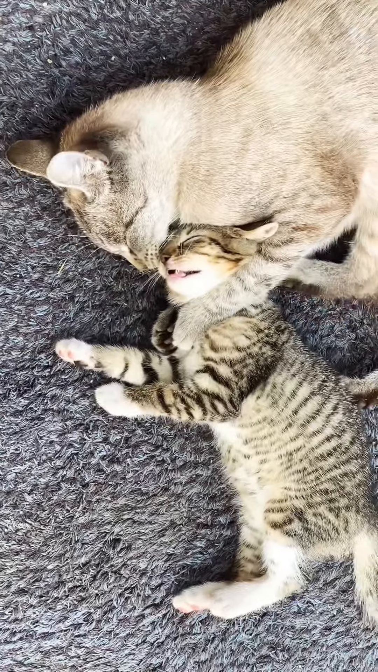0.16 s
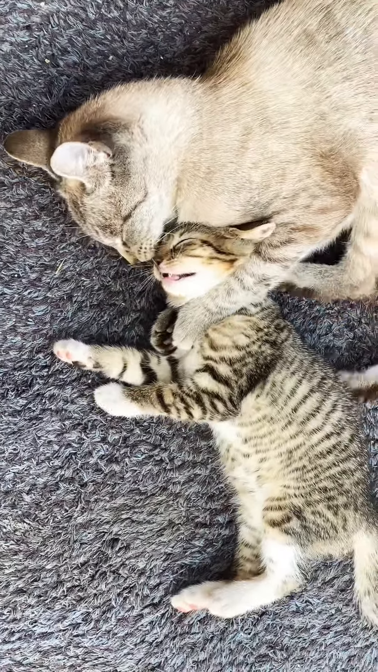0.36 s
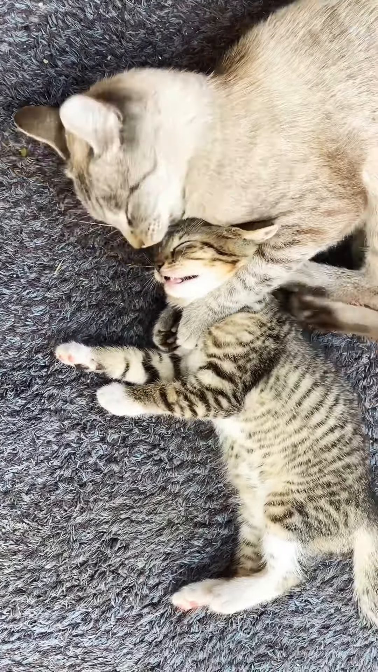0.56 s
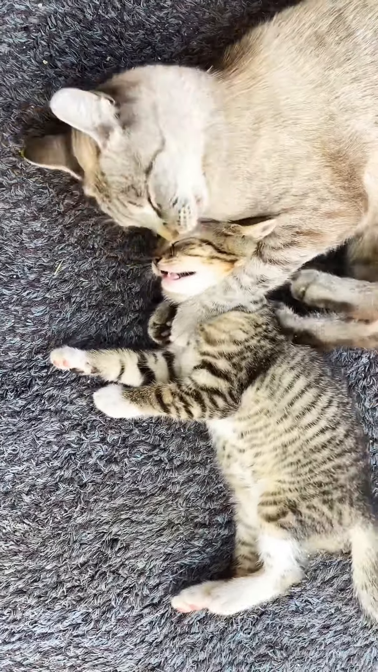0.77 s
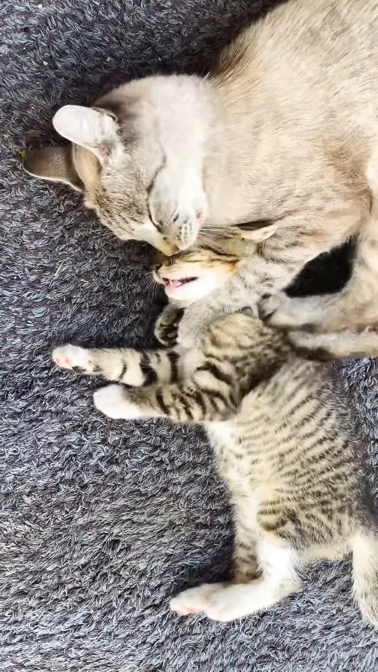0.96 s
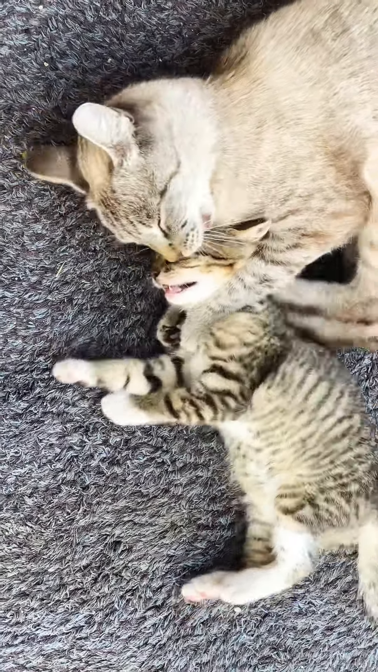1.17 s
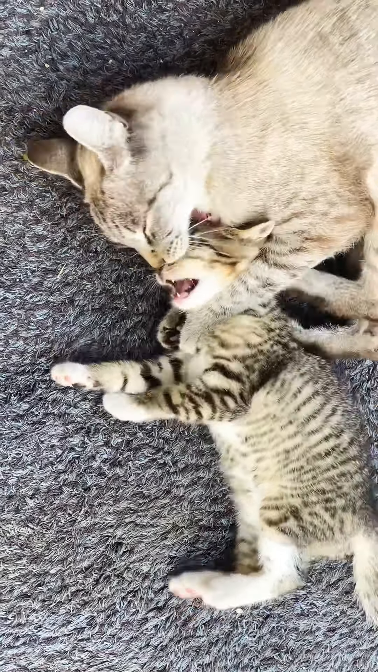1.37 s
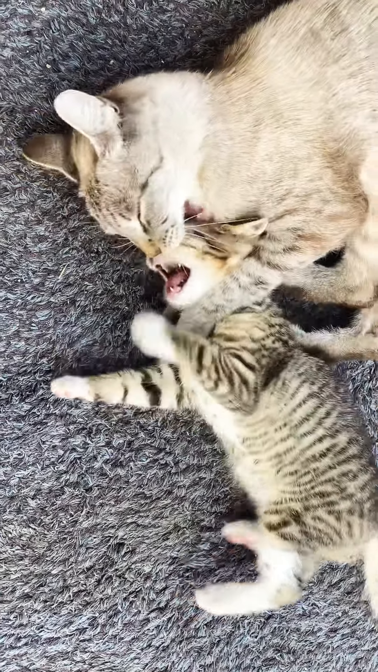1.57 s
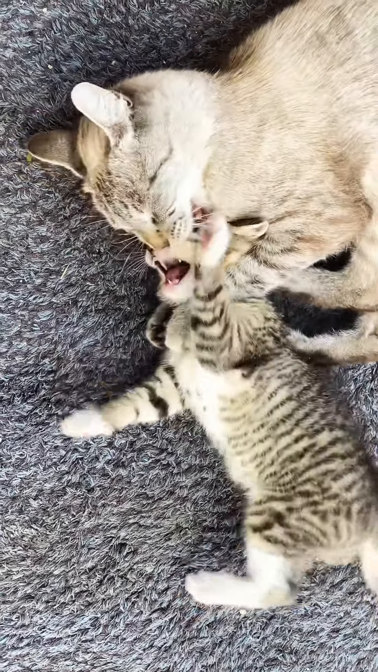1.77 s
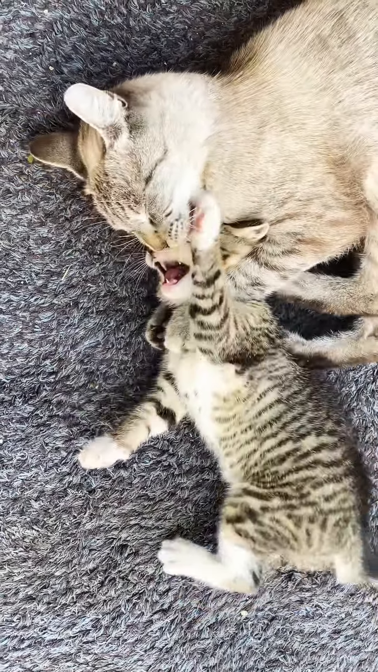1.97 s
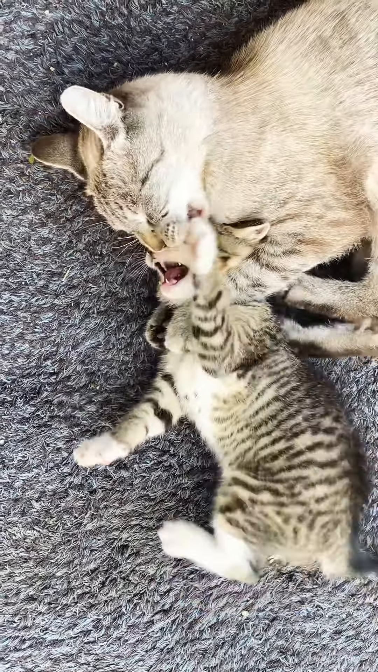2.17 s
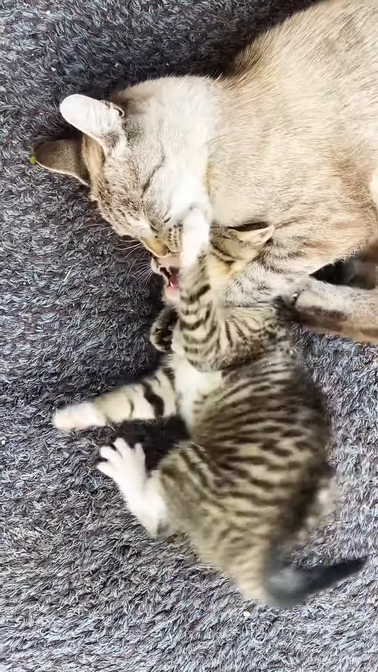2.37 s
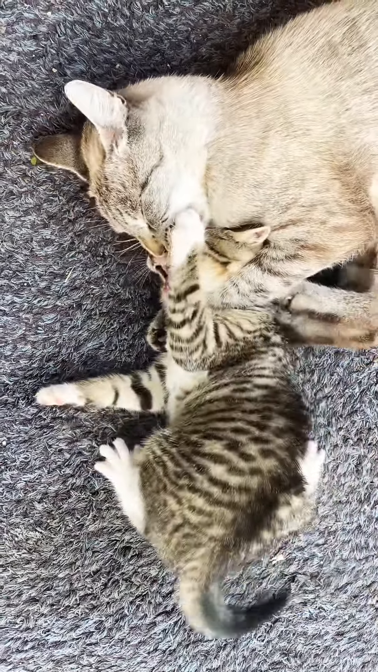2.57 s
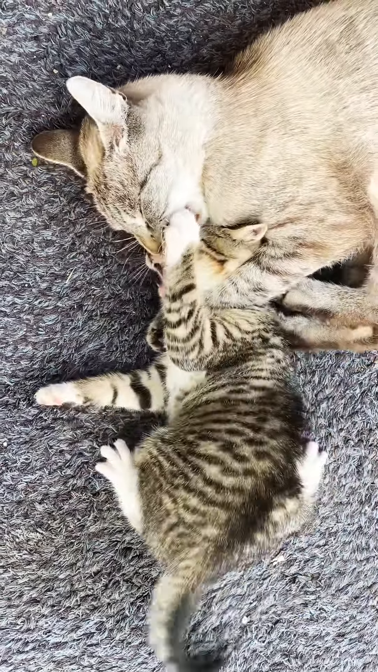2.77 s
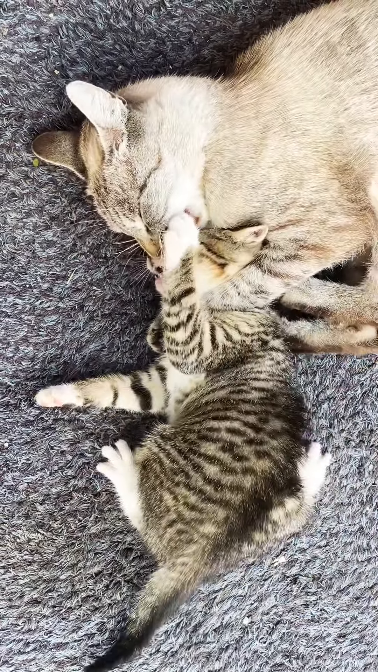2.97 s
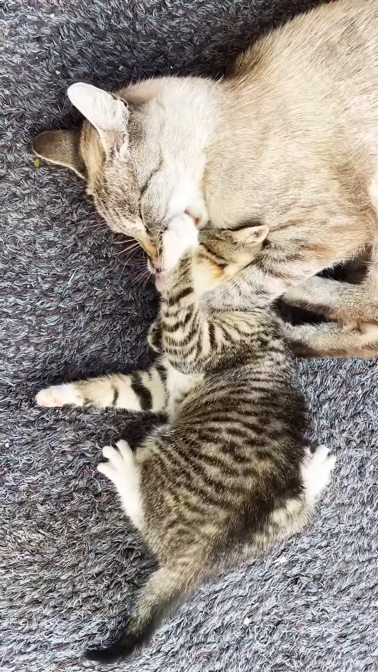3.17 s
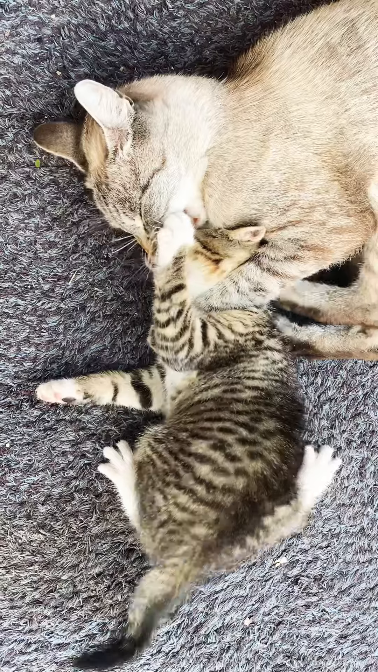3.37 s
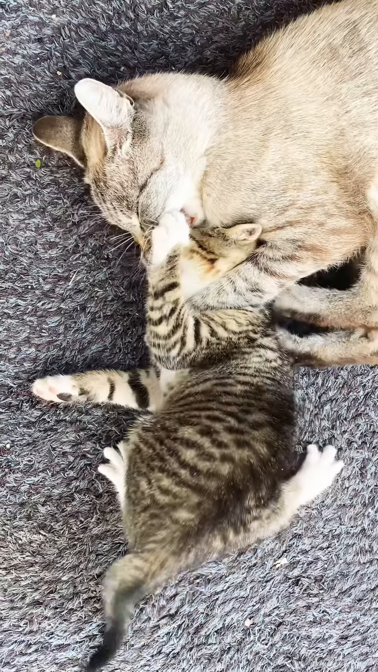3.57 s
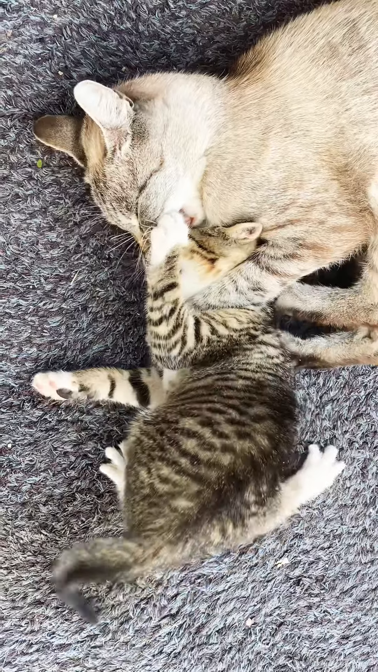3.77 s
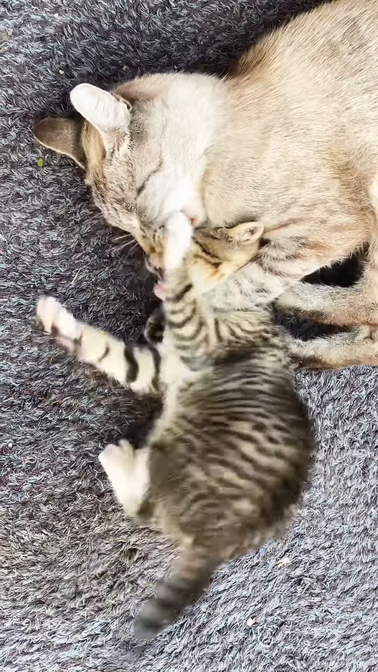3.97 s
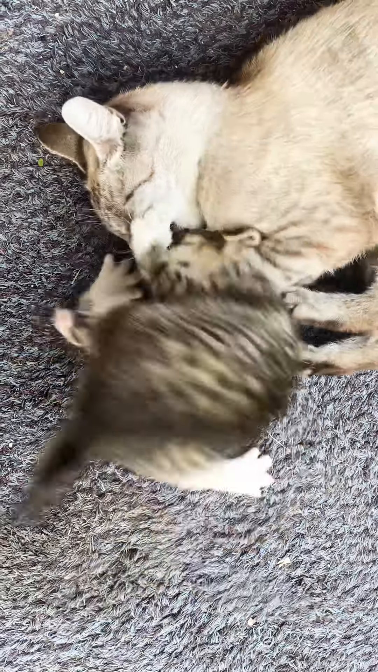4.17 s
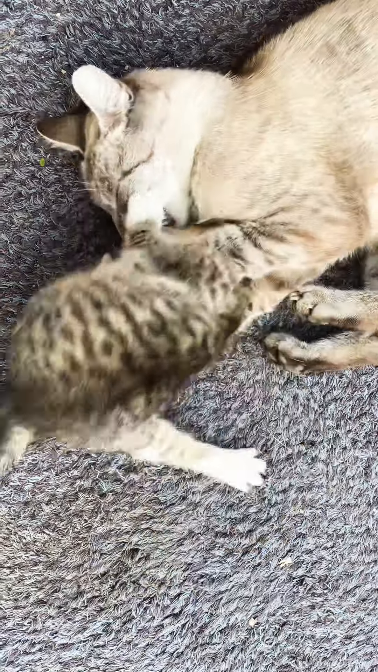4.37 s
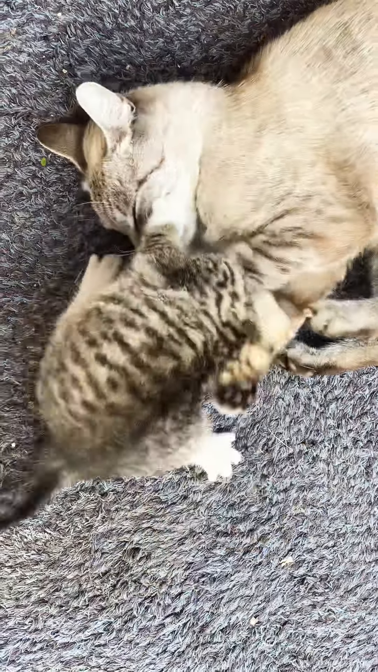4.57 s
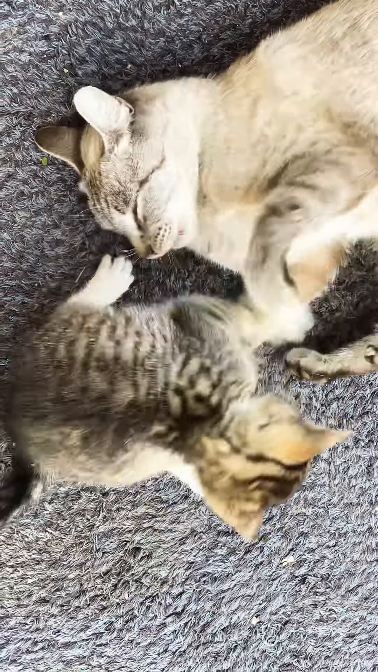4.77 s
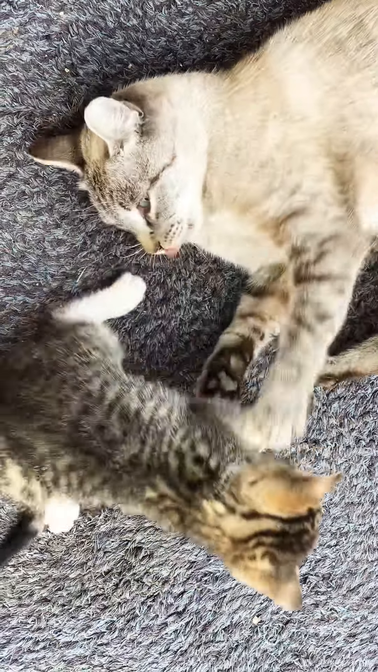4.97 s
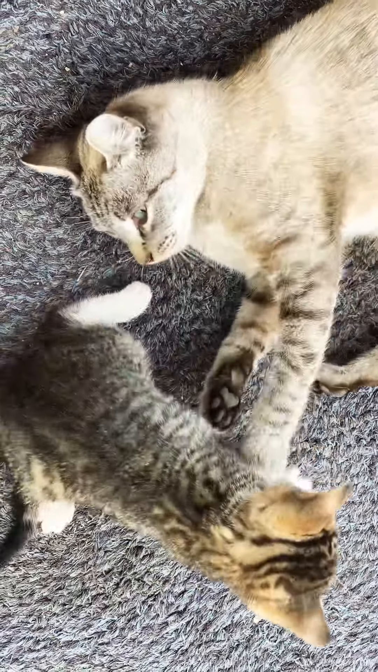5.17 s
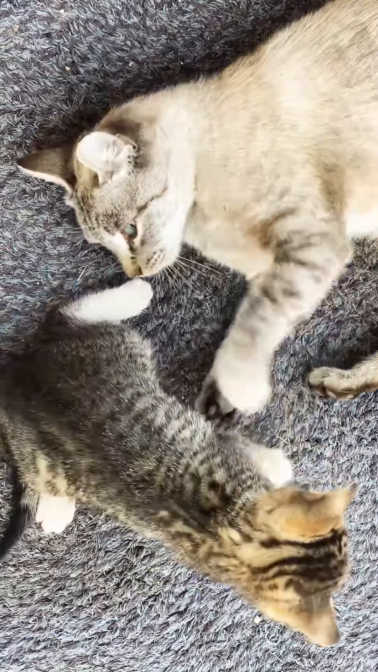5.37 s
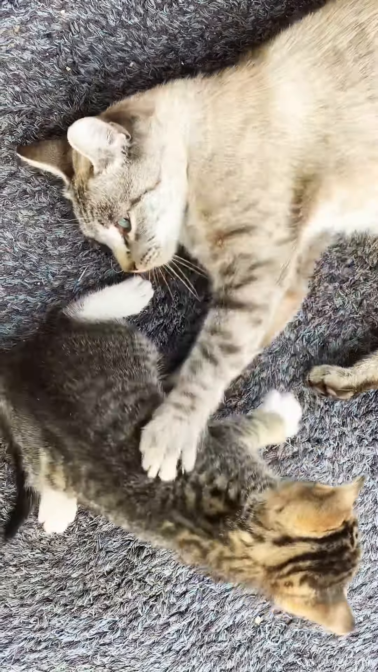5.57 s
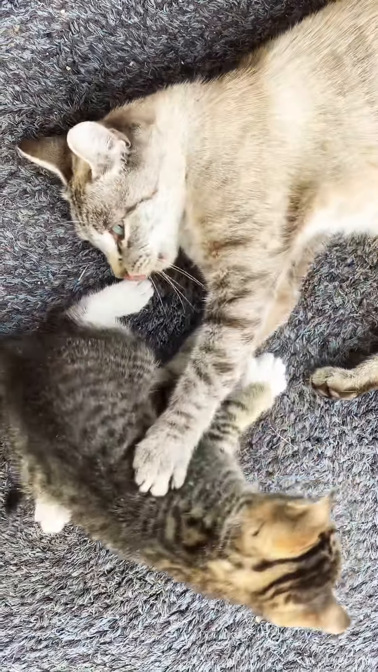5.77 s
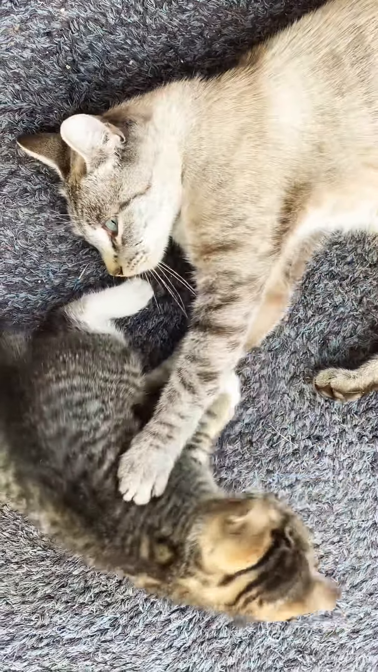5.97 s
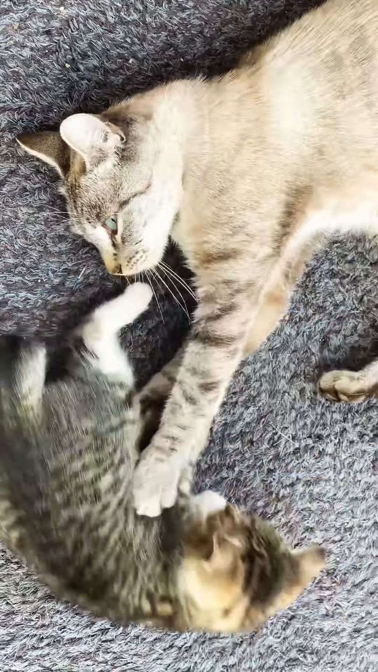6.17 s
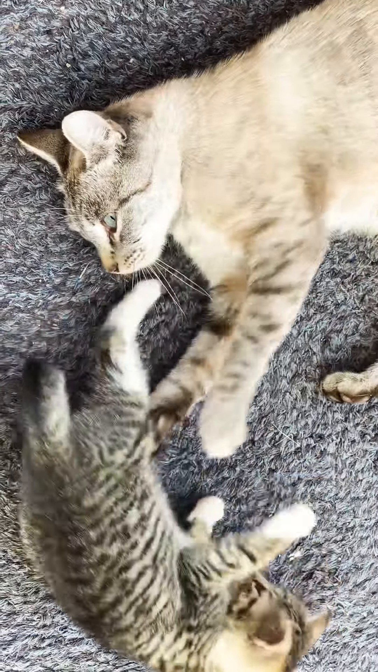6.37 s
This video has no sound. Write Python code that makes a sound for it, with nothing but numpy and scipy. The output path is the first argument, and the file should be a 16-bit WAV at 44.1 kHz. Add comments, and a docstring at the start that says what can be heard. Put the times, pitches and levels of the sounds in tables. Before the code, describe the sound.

A small kitten gives two long, thin, raspy mews close by, then wriggles free with soft thumps and rubbing over a faint low room hum.

```python
"""A kitten, held down and groomed by its mother on a carpet, gives two long, thin mews close by.
Each mew climbs in, cracks into a hoarse rasp, clears to a held whistle and drops as the mouth shuts:
fold pulses and air puffs through a fixed throat and a moving mouth resonance.
Then it wriggles free. Ticks, fur strokes, a soft breath puff and rubbing are shaped noise, paw thumps are
damped low tones; behind lie a low rumble, a wavering hum and faint hiss."""
import sys
import numpy as np
from scipy import signal
from scipy.fft import rfft, irfft
from scipy.io import wavfile
from scipy.ndimage import uniform_filter1d

SR = 44100
rng = np.random.default_rng(int(sys.argv[2]) if len(sys.argv) > 2 else 0)


def inscribe(sig):
    """Save sig as 16-bit PCM at rate SR to the path in sys.argv[1].

    A 1-D sig is mono; a 2-D sig holds one channel per row.
    Samples are clipped to [-1, 1] before scaling.
    """
    pcm = np.round(np.clip(np.atleast_2d(sig).T, -1, 1) * 32767)
    wavfile.write(sys.argv[1], SR, pcm.astype(np.int16))


N = 283122
TIME = np.arange(N) / SR
BINS = np.fft.rfftfreq(N, 1 / SR)
EDGE_HZ = 15800  # upper band limit


def amp(db):
    """Decibels to gain."""
    return 10 ** (np.asarray(db) / 20)


def unit(x):
    """Scales to rms 1."""
    return x / np.sqrt(np.mean(x ** 2) + 1e-30)


def levelled(x):
    """Scales to a running rms of 1."""
    return x / np.sqrt(abs(uniform_filter1d(x ** 2, size=400)) + 1e-12)


def read(points, hz):
    """Interpolates a spectrum table on a log-frequency axis."""
    f, value = np.transpose(points)
    return np.interp(np.log(hz + 1), np.log(f + 1), value)


def ramp(t, start_s, length_s):
    """Rises from 0 to 1 over the given time."""
    return np.clip((t - start_s) / length_s, 0, 1)


def blend(a, b, share):
    """Moves from a to b as share goes from 0 to 1."""
    return a + (b - a) * share


def wander(size, corner_hz):
    """Smooth random signal of rms 1: noise rolled off above corner_hz."""
    f = np.fft.rfftfreq(size, 1 / SR)
    spectrum = rfft(rng.standard_normal(size))
    return unit(irfft(spectrum / np.sqrt(1 + (f / corner_hz) ** 4), size))


def band_noise(size, centre_hz, width_octaves):
    """Noise of rms 1 in a bell-shaped band."""
    f = np.fft.rfftfreq(size, 1 / SR) + 1
    bell = np.exp(-.5 * (np.log2(f / centre_hz) / width_octaves) ** 2)
    return unit(irfft(rfft(rng.standard_normal(size)) * bell, size))


def add(mix, start_s, sound):
    """Mixes a sound in at its start time."""
    part = mix[max(round(start_s * SR), 0):][:len(sound)]
    part += sound[:len(part)]


def room_tone(swell_db=1.33):
    """Partly coherent low rumble and a wavering hum, the hum alike in both ports, under a faint hiss."""
    # rumble spectrum: hz, relative_level_db
    rumble_spectrum = [(10, -46.5), (25, -17.5), (36, -6), (65, -2), (100, -7.5), (200, -18), (350, -21.5),
                       (700, -25), (1400, -33), (2500, -41.5), (6500, -46.5), (9000, -63)]
    # left-right coherence: hz, coherence (1 = identical)
    coherence = [(60, 0.99), (130, 1), (290, 0.74), (640, 0), (1400, 0.15), (3100, 0.96), (6000, 0),
                 (15000, 0.041)]
    rumble_db, hum_db, hiss_db = -66, -72, -92.5
    hum_hz = 66
    a, b = rfft(rng.standard_normal((2, N)))
    same = np.clip(read(coherence, BINS), -1, 1)
    pair = np.array([a, same * a + np.sqrt(1 - same ** 2) * b])
    rumble = unit(irfft(pair * amp(read(rumble_spectrum, BINS)), N))
    hum_angle = 2 * np.pi * np.cumsum(hum_hz * (1 + 0.021 * wander(N, 20))) / SR
    hum = np.sqrt(2) * np.sin(hum_angle)
    hiss = np.array([band_noise(N, 14000, 0.13) + 0.067 * band_noise(N, 4000, 0.21) for side in range(2)])
    rumble = rumble * amp(swell_db * wander(N, 5.7))
    return amp(rumble_db) * rumble + amp(hum_db) * hum + amp(hiss_db) * hiss


def room(x):
    """The short, dull tail of a carpeted room: decaying noise, different at each port."""
    # reverberation time: hz, t60_s
    decay_times = [(200, 0.85), (1000, 0.33), (4500, 0.083), (14000, 0.05)]
    f, t, z = signal.stft(rng.standard_normal((2, SR // 2)), SR, nperseg=256)
    decay = amp(-60 * t / read(decay_times, f)[:, None])
    tail = signal.istft(z * decay, SR, nperseg=256)[1]
    tail *= np.clip(TIME[:tail.shape[1]] / 0.0056, 0, 1)
    return signal.fftconvolve(x[None], tail / np.linalg.norm(tail[0]), axes=1)[:, :N]


def ports(x):
    """A near source reaches the two microphone ports with a phase difference."""
    # lead of the left port over the right: hz, phase_rad
    port_phase = [(260, 0), (690, .9), (1200, .4), (2500, .7), (3900, .5), (4450, 1.1), (5000, 2.2),
                  (5700, 1.5), (7500, 2.6), (8100, 3.0), (10700, 3.3), (13200, 4.2), (15700, 5.4)]
    turn = np.exp(.5j * read(port_phase, BINS))
    return irfft(rfft(x) * np.array([turn, 1 / turn]), N)


def thumps():
    """The padded floor answers each blow of paws and bodies with a few damped low cycles."""
    # blows: start_s, level_db, centre_hz, decay_s
    blows = [(0.734, -55, 62.2, 0.058), (0.823, -48.5, 281, 0.0024), (0.833, -47.5, 71, 0.027),
             (0.982, -55, 65, 0.028), (4.942, -50.5, 74.3, 0.014), (5.014, -53, 56.6, 0.02),
             (5.555, -49, 80.5, 0.025)]
    out, t = np.zeros(N), TIME[:SR // 3]
    for start_s, level_db, hz, decay_s in blows:
        decay = np.exp(-t / decay_s)
        ring = np.sin(2 * np.pi * hz * t) + 0.58 * band_noise(len(t), 2 * hz, 0.39) * decay
        add(out, start_s, amp(level_db) * ring * decay * (1 - np.exp(-t / 0.0017)))
    return out


def scuffle(level_db, centre_hz, width_octaves, swell_db=1.5):
    """Bodies shift and rub on the carpet as the kitten wriggles free: unevenly swelling band noise."""
    # time span: start_s, end_s (fade-out start)
    span = (5.45, 6.42)
    start_s, end_s = span
    moving = ramp(TIME, start_s, 0.045) * (1 - ramp(TIME, end_s, .05))
    moving = moving * amp(swell_db * wander(N, 8.6))
    return moving * amp(level_db) * band_noise(N, centre_hz, width_octaves)


def strokes_and_puff(grain_db=2.0):
    """Strokes of fur and tongue over fur and pile, and a soft low breath puff as the first mew closes."""
    # swells of uneven noise, the one at 2.835 s the puff: middle_s, level_db, centre_hz, half_length_s
    swells = [(.529, -78, 5060, 0.023), (.763, -81.5, 1100, 0.056), (2.835, -58.5, 500, .034),
              (4.12, -73, 1500, .07), (4.39, -79.5, 4400, 0.069), (4.68, -80, 605, .078),
              (4.915, -76, 1870, 0.049), (5.5, -83, 1610, 0.04), (5.563, -69, 500, 0.071),
              (6.047, -75, 500, .06)]
    out = np.zeros(N)
    for middle_s, level_db, hz, half_s in swells:
        t = np.arange(-2 * half_s, 2 * half_s, 1 / SR)
        grain = band_noise(len(t), hz, 0.69)
        grain = unit(grain * amp(grain_db * wander(len(t), 110)))
        add(out, middle_s + t[0], amp(level_db) * grain * np.exp(-(t / half_s) ** 2))
    return out


def ticks():
    """Tiny wet tongue clicks and claw snags: noise bursts with a crisp edge, gone in milliseconds."""
    # bursts: start_s, level_db, centre_hz, width_octaves, decay_s, edge_level_db
    bursts = [(.517, -54, 5050, 0.25, .0012, -66), (.773, -65.5, 2170, .34, 0.0019, -67),
              (.821, -65, 745, 0.92, 0.0063, -87), (1.057, -67, 550, 0.18, 0.018, -90),
              (4.861, -51, 2200, 0.16, .002, -81), (4.897, -68, 2580, .9, 0.003, -60),
              (5.465, -67.5, 3030, .35, 0.0085, -68)]
    edge_hz, edge_octaves, edge_decay_s = 7200, 0.86, 0.0048
    out, t = np.zeros(N), TIME[:4096]
    for start_s, level_db, hz, octaves, decay_s, edge_db in bursts:
        body = amp(level_db) * band_noise(len(t), hz, octaves) * np.exp(-t / decay_s)
        edge = amp(edge_db) * band_noise(len(t), edge_hz, edge_octaves) * np.exp(-t / edge_decay_s)
        add(out, start_s, (body + edge) * (1 - np.exp(-t / 0.0001)))
    return out


def lips():
    """The lips part or meet with a tiny decaying hiss."""
    # hisses: start_s, level_db
    partings = [(1.426, -67), (2.808, -62), (4.084, -65)]
    out, t = np.zeros(N), TIME[:4096]
    for start_s, level_db in partings:
        add(out, start_s, amp(level_db) * band_noise(len(t), 12500, .45) * np.exp(-t / .01))
    return out


def gulp():
    """The throat closes on the first mew with a short, falling knock: a gliding tone burst."""
    # knock: middle_s, level_db, pitch_hz (at the middle), glide_hz_per_s, half_length_s
    knock = (2.812, -48, 720, -9000, .009)
    middle_s, level_db, hz, glide_hz_per_s, half_s = knock
    t = np.arange(-3 * half_s, 3 * half_s, 1 / SR)
    tone = np.sqrt(2) * np.sin(2 * np.pi * np.cumsum(hz + glide_hz_per_s * t) / SR)
    return middle_s + t[0], amp(level_db) * tone * np.exp(-(t / half_s) ** 2)


def gesture(lead_in, crack, note, closing):
    """Controls of one mew: a rising lead-in, a hoarse crack, a held note, a fall as the mouth shuts."""
    # brief surges and slips of effort: start_s, length_s, pitch_rise_share, extra_db, rasp_0_to_1
    surges = [(1.422, 0.031, 0.0069, 11, .25), (1.451, .007, 0.071, 19.5, 0.3),
              (1.604, 0.013, 0.062, 4, 0.97), (1.621, .008, 0, -7, 0.97), (1.67, .031, .2, 3.5, .15),
              (2.809, 0.011, 0, 8, 0.74), (3.224, .016, 0, 3, .1), (3.274, .05, 0.0089, 2.5, .55),
              (3.406, 0.023, .065, 4.5, .1)]
    crack_switch_s, clear_s, surge_edge_s = .006, 0.016, .004  # how fast the folds change state
    clear_rasp, hoarse_half = 0.021, 0.9  # half: strong-weak alternation of the pulses, 0-1
    grunt_at = 0.6  # share of the closing at which the grunt peaks
    start, attack_s, from_hz, to_hz, from_db, to_db, lead_low_db, lead_rasp = lead_in
    crack_s, crack_hz, crack_db, crack_low_db, crack_mouth_hz, crack_rasp = crack
    shut_s, last_hz, last_mouth_hz, grunt_db, last_rasp = closing
    s, *columns = np.transpose(note)
    t = np.arange(start, s[-1] + shut_s, 1 / SR)
    pitch, level_db, low_db = (np.interp(t, s, c) for c in columns)
    pitch = uniform_filter1d(pitch, size=round(0.01496 * SR))  # smooths the held pitch
    # the hoarse stretch holds, then sinks onto the note
    sink = ramp(t, crack_s, s[0] - crack_s)
    hoarse = 1 - ramp(t, s[0] - clear_s, clear_s)
    pitch = blend(crack_hz, pitch, sink ** 3.5)
    level_db = blend(crack_db, level_db + 2, sink ** 6)
    low_db = blend(low_db, crack_low_db, hoarse)
    rasp = blend(clear_rasp, crack_rasp, hoarse)
    # before it, pitch and level climb
    climb = np.sin(np.pi / 2 * ramp(t, start, crack_s - start))
    cracked = ramp(t, crack_s - crack_switch_s / 2, crack_switch_s)
    pitch = blend(blend(from_hz, to_hz, climb ** 1.8), pitch, cracked)
    level_db = blend(blend(from_db, to_db, climb), level_db, cracked)
    low_db = blend(lead_low_db, low_db, cracked)
    rasp = blend(lead_rasp, rasp, cracked) * (1 + 0.25 * wander(len(t), 25))
    half = blend(lead_rasp / 2, blend(clear_rasp, hoarse_half, hoarse), cracked)
    # closing: the folds slacken and the sound leaves through the nose
    shut = ramp(t, s[-1], shut_s)
    pitch = blend(pitch, last_hz, shut ** 1.7)
    level_db = blend(level_db, -71, shut ** 1.02)
    low_db = blend(low_db, grunt_db, ramp(shut, 0, grunt_at) ** 3)  # the grunt swells late
    low_db = blend(low_db, -72, ramp(shut, grunt_at, 1 - grunt_at))
    rasp = blend(rasp, last_rasp, shut)
    for at_s, length_s, rise, extra_db, surge_rasp in surges:
        surge_end = ramp(t, at_s + length_s - surge_edge_s / 2, surge_edge_s)
        surge = ramp(t, at_s, surge_edge_s) - surge_end
        pitch = pitch * (1 + rise * surge * (1 + ramp(t, at_s, length_s)) / 2)
        level_db = level_db + extra_db * surge
        low_db = low_db + 0.25 * extra_db * surge
        rasp = blend(rasp, surge_rasp, surge)
    # the mouth opens with effort: 31 Hz per dB; slow folds go with a narrower mouth
    mouth_hz = (4150 + 31 * (level_db + 47)) * np.minimum(pitch / to_hz, 1) ** .3
    mouth_hz = blend(mouth_hz, crack_mouth_hz, hoarse * cracked)
    mouth_hz = blend(mouth_hz, last_mouth_hz, shut)
    release_s = 0.015
    envelope = ramp(t, start, attack_s) * (1 - ramp(t, t[-1] - release_s, release_s))
    return t, envelope, pitch, level_db, low_db, mouth_hz, np.clip(half, 0, 1), np.clip(rasp, 0, 1)


def vocal_tract(x, t, mouth_hz, treble_db, skirt_db, width_hz=1300):
    """The fixed throat times one moving mouth resonance, with shelves above and below the formants."""
    # throat response: hz, gain_db
    throat = [(300, -45), (1200, -23), (2050, -16), (2600, -21), (3250, -5), (3900, -4.5), (4550, 0),
              (5200, 0), (6100, -12), (7200, -17), (11400, -12), (12700, -18), (14000, -13), (15800, -18)]
    f, at, z = signal.stft(x, SR, nperseg=256, noverlap=192)
    f, at = f[:, None], at + t[0]
    mouth = 1 / np.sqrt(1 + (2 * (f - np.interp(at, t, mouth_hz)) / width_hz) ** 2)
    above_db = np.interp(at, t, treble_db) * np.clip((f - 5320) / 1300, 0, 1)
    below_db = np.interp(at, t, skirt_db) * np.clip((3200 - f) / 600, 0, 1)
    z = z * mouth * amp(read(throat, f) + above_db + below_db)
    return signal.istft(z, SR, nperseg=256, noverlap=192)[1][:len(x)]


def mew(t, envelope, pitch, level_db, low_db, mouth_hz, half, rasp, waver=0.0042, jitter=.028, puff=.55,
        shimmer=0.083, half_low=0.3, soft_treble=0.92, rasp_dull_db=4, smear=1.0, husk_db=-35):
    """Fold pulses, clean or doubled and jittery, with puffs of air, ring the small throat."""
    size = len(t)
    unsteady = 1 + waver * wander(size, 50) + jitter * rasp * wander(size, 500)
    angle = 2 * np.pi * np.cumsum(pitch * unsteady) / SR
    # whole multiples of the pitch; the ones halfway between appear when every second pulse is weak
    pulses, low = np.zeros(size), np.zeros(size)
    for k in np.arange(.5, 20, .5):
        # folds out of step: partials drift against each other in size and phase
        drift = smear * half * k ** .5 * wander(size, 49)
        partial = amp((3.5 + 0.6 * half) * wander(size, 14)) * np.cos(k * angle + drift)
        pulses += (half if k % 1 else 1) * (k * pitch < EDGE_HZ) * partial * (k > 1)
        # the lowest partials leave through a broad resonance of nose and chest
        chest = np.exp(-.5 * (np.log2(k * pitch / 950) / .5) ** 2)
        low += (half_low * half if k % 1 else 1) * chest * partial
    pulses *= np.sqrt(2 * pitch / EDGE_HZ)
    air = (1 + np.cos(angle)) * rng.standard_normal(size)  # air escapes while the folds are open
    # the formants outgrow the top treble in loud passages, and loose folds close less sharply
    treble_db = -soft_treble * np.clip(level_db + 39.0, -10, 12) - rasp_dull_db * np.maximum(half, rasp)
    treble_db += 38 * np.minimum(np.log2(pitch / 1100), 0)  # slack, slow folds give few high partials
    skirt_db = -.45 * np.clip(level_db + 50.5, 0, 14) * (1 - half)  # loud, clean: gathers in the formants
    skirt_db += 2 * half  # loose folds fill the valley below the formants
    source = (1 - rasp / 2) * pulses + puff * rasp * air
    voice = levelled(vocal_tract(source, t, mouth_hz, treble_db, skirt_db))
    # fitful turbulence rings the main formant
    voice += amp(husk_db + 6.9 * wander(size, 13)) * band_noise(size, 4040, .12)
    low = levelled(low + 0.33 * rasp * band_noise(size, 1450, 0.97))
    flutter = 1 + (shimmer + 0.11 * rasp) * wander(size, 130)
    body = amp(low_db + 1.6 * wander(size, 24)) * low
    return t[0], (amp(level_db) * voice + body) * flutter * envelope


def kitten_calls():
    """Two mews, each from lead-in, crack, held note and closing, with lip hisses and a gulp."""
    # lead-ins: start_s, attack_s, from_hz, to_hz, from_db, to_db, lowest_partials_db, rasp_0_to_1
    lead_ins = [(1.422, 0.0045, 800, 1052, -65.5, -60, -70.5, .6),
                (3.144, 0.025, 432.7, 1254, -90, -40, -60.5, .14)]
    # hoarse cracks: start_s, pitch_hz, level_db, lowest_partials_db, mouth_hz, rasp_0_to_1
    cracks = [(1.557, 1342, -42, -61, 4120, 0.8), (3.274, 1342, -36.5, -57, 4630, .4)]
    # held notes: time_s, pitch_hz, upper_harmonics_db (before a 2 dB lift), fundamental_db
    first_note = [(1.78, 1225, -48, -83), (1.878, 1251, -57.5, -70.5), (1.93, 1218, -56.5, -87),
                  (2.02, 1267, -52.5, -64.5), (2.074, 1236, -53.5, -80), (2.148, 1181, -61, -62),
                  (2.238, 1136, -60, -69), (2.316, 1100, -57.5, -62), (2.478, 1170, -52.5, -61),
                  (2.59, 1132, -51.5, -62.5), (2.694, 1076, -55, -58), (2.76, 1010, -53.5, -56.5)]
    second_note = [(3.51, 1159, -41.5, -58.5), (3.59, 1189, -40.5, -59), (3.64, 1250, -38.5, -69),
                   (3.69, 1273, -35.5, -59.5), (3.735, 1258, -35, -58.5), (3.795, 1275, -35, -57),
                   (3.84, 1201, -38, -60), (3.88, 1248, -36, -67), (3.95, 1201, -43.5, -58),
                   (3.972, 1263, -38, -67.5), (4.01, 1196, -47, -55.5)]
    # mouth closings: length_s, last_pitch_hz, last_mouth_hz, grunt_db, last_rasp_0_to_1
    closings = [(.095, 280.5, 3870, -56, 0.99), (.095, 650, 1200, -56, .5)]
    out = np.zeros(N)
    for controls in zip(lead_ins, cracks, (first_note, second_note), closings):
        add(out, *mew(*gesture(*controls)))
    out += lips()
    add(out, *gulp())
    return out


def scene():
    """Kitten and small movements close by, the room behind."""
    # bodies on the floor: level_db, centre_hz, width_octaves
    shifting = (-64, 70.6, 0.64)
    # fur on the pile: level_db, centre_hz, width_octaves
    rubbing = (-80.5, 560, 0.71)
    kitten = kitten_calls()
    details = ticks() + strokes_and_puff() + scuffle(*rubbing)
    floor = thumps() + scuffle(*shifting)
    tails = amp(-23) * room(kitten) + amp(-18) * room(details)
    return ports(kitten + details) + floor + tails + room_tone()


def record(dry):
    """Linear-phase low-pass at the upper band limit."""
    low_pass = signal.firwin(511, EDGE_HZ, window=("kaiser", 9), fs=SR)
    return signal.oaconvolve(dry, low_pass[None], "same")


dry = scene()
out = record(dry)
inscribe(out)
```